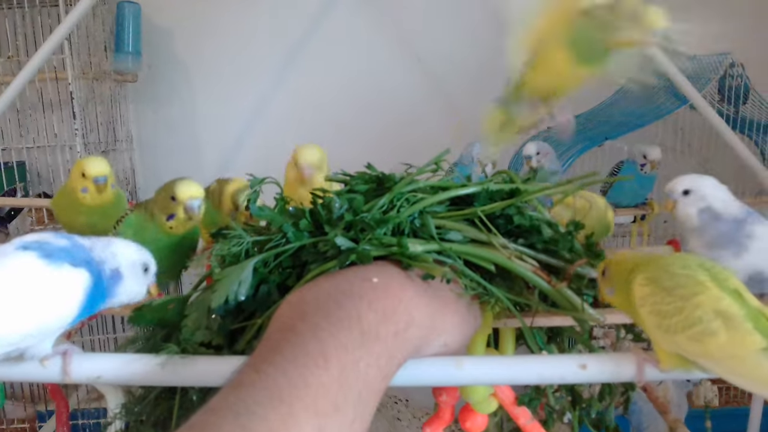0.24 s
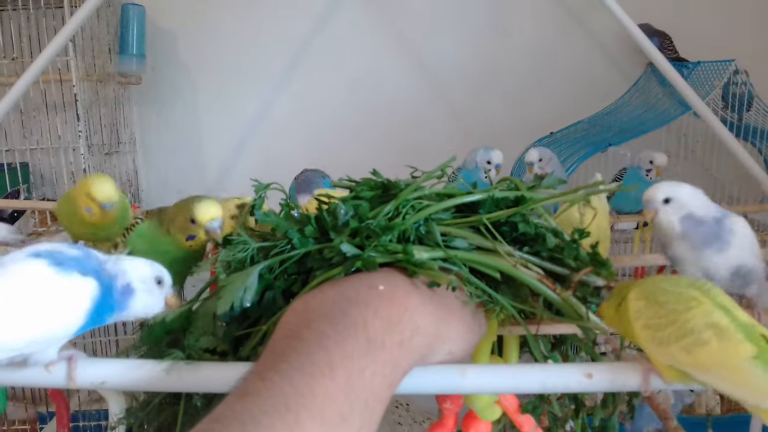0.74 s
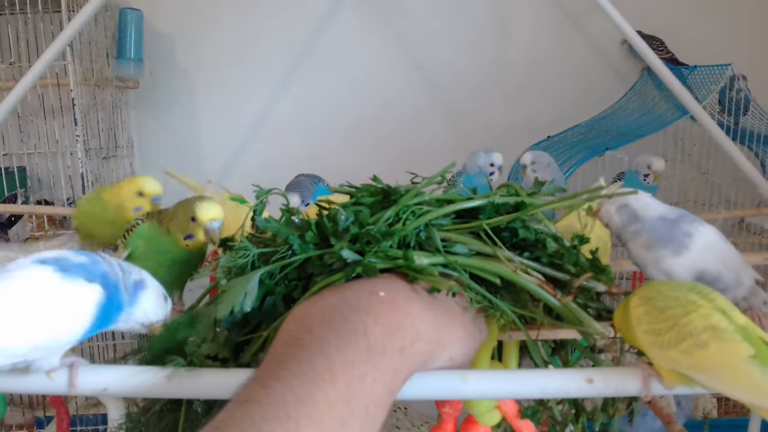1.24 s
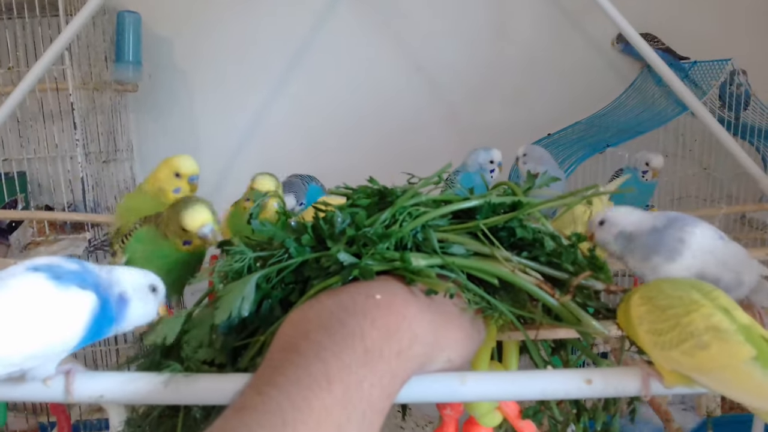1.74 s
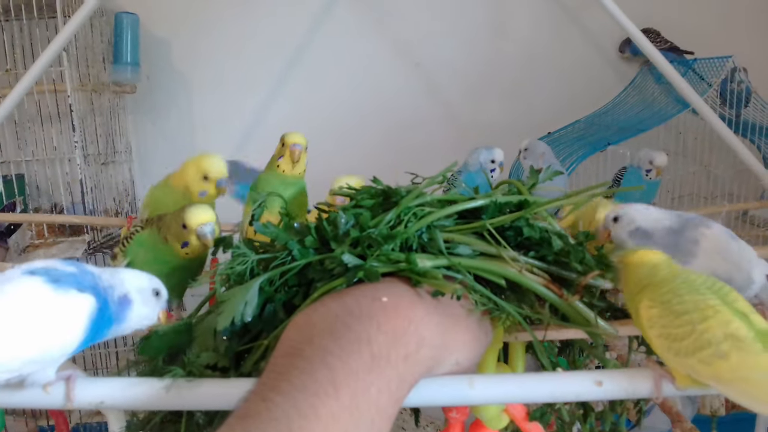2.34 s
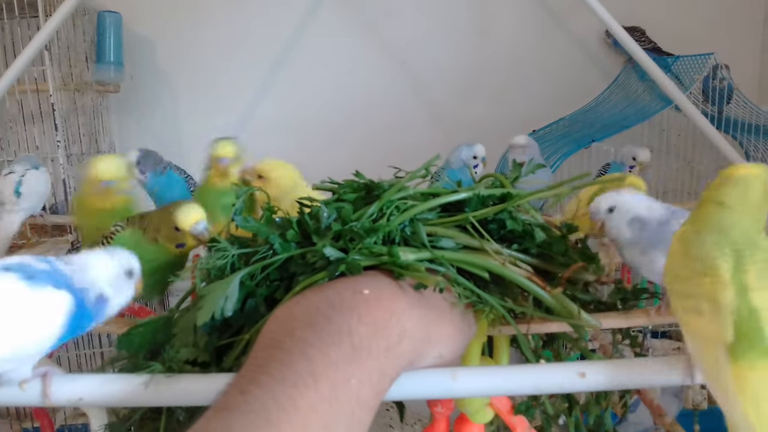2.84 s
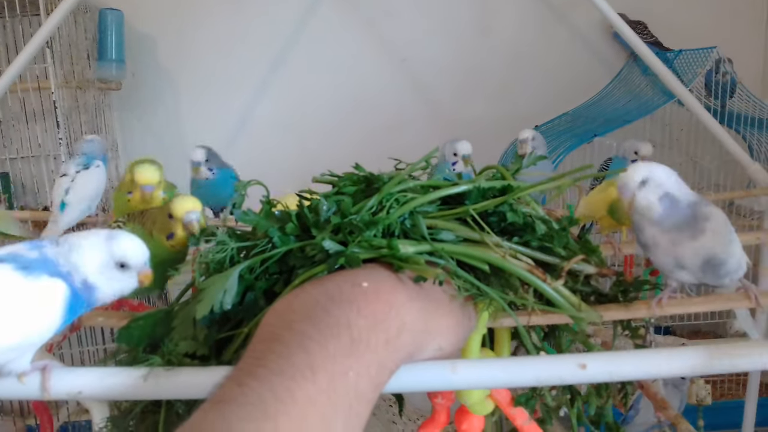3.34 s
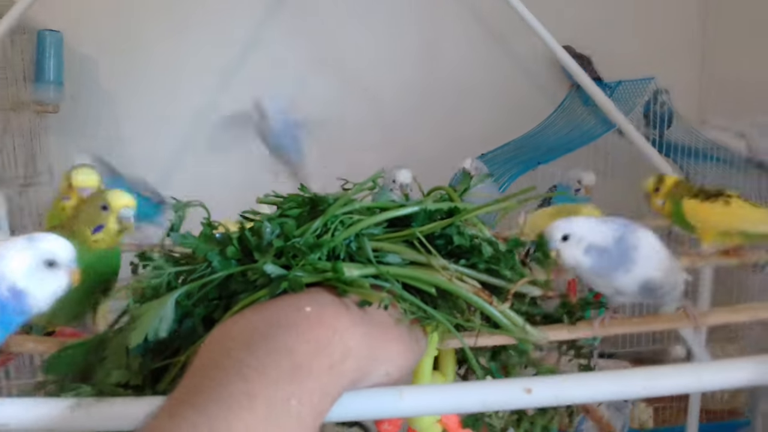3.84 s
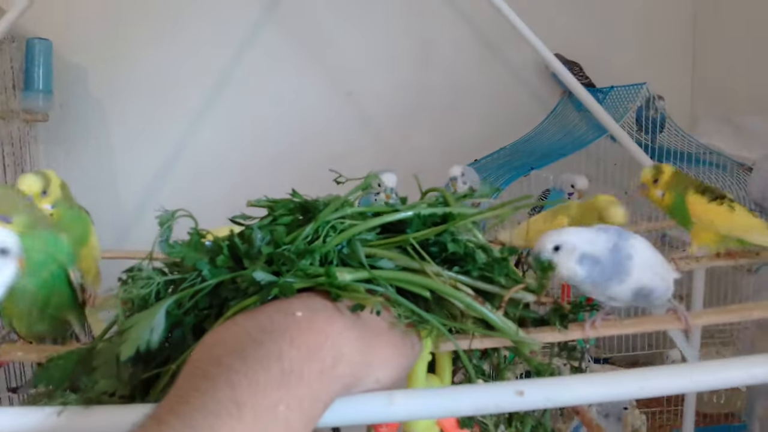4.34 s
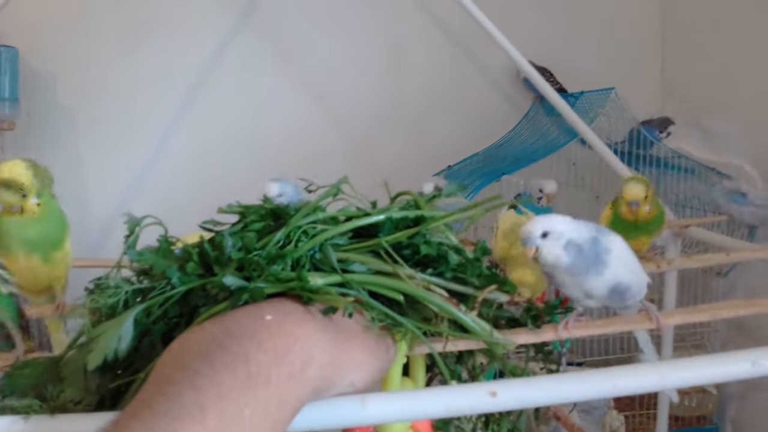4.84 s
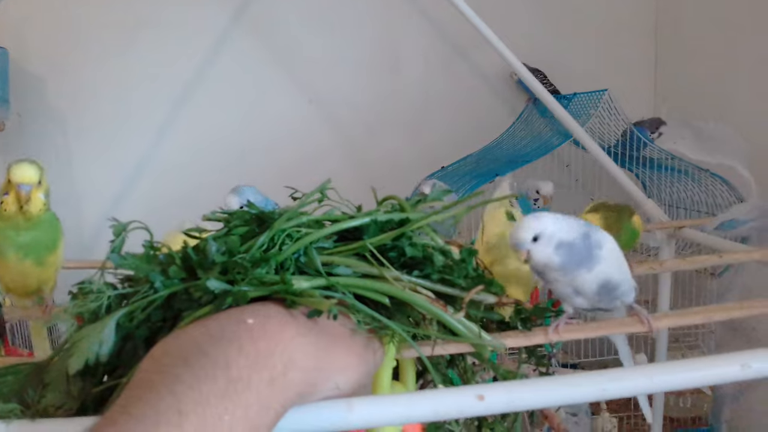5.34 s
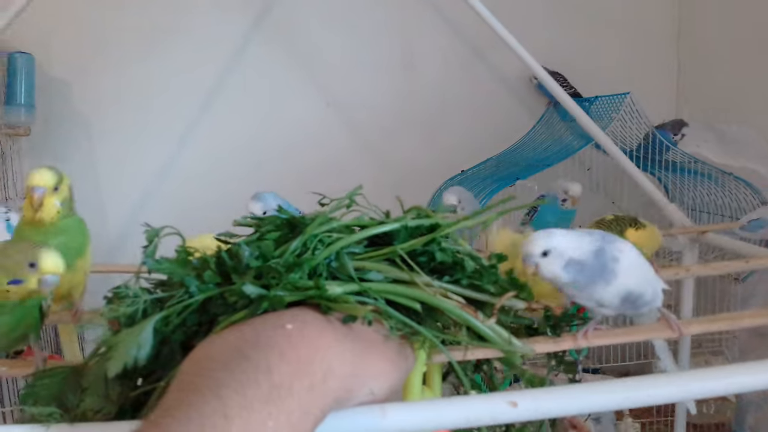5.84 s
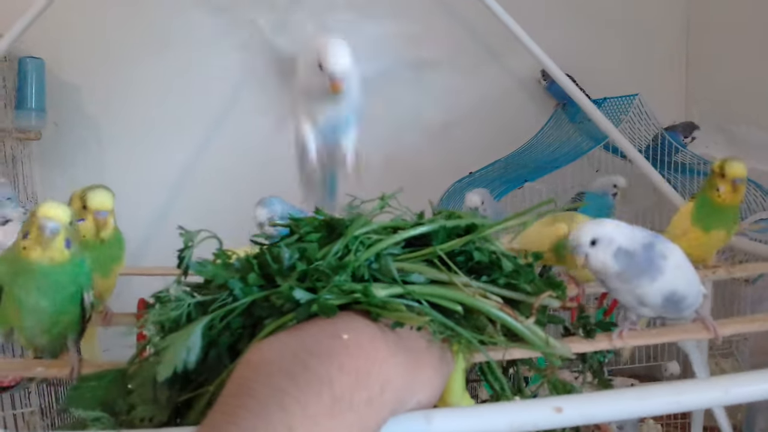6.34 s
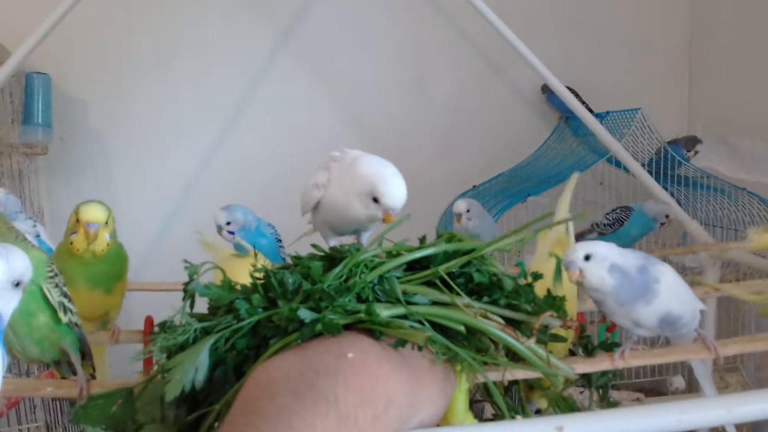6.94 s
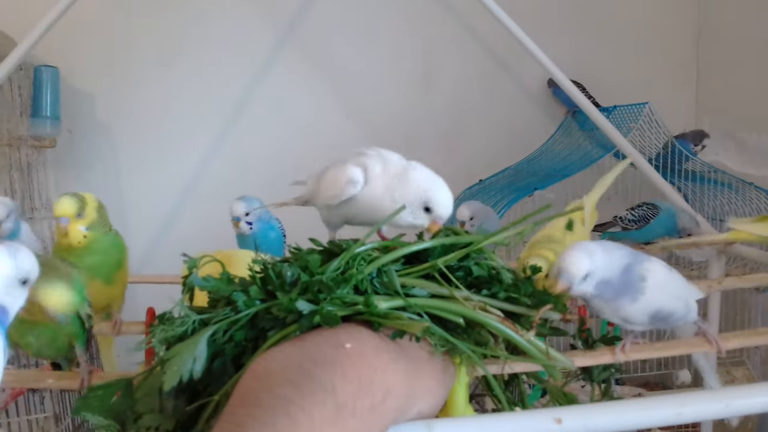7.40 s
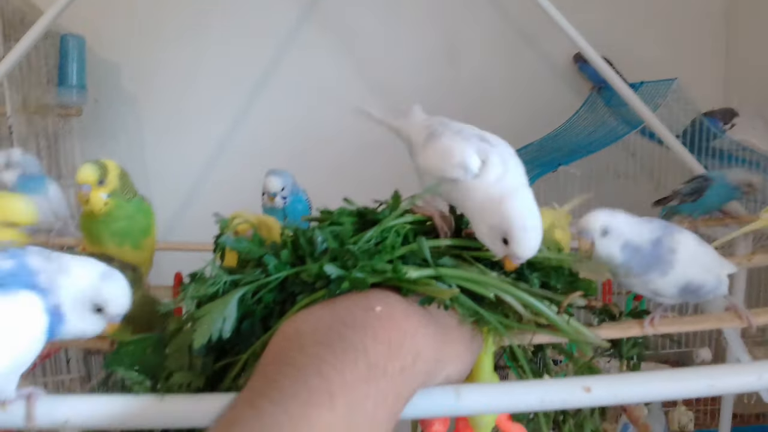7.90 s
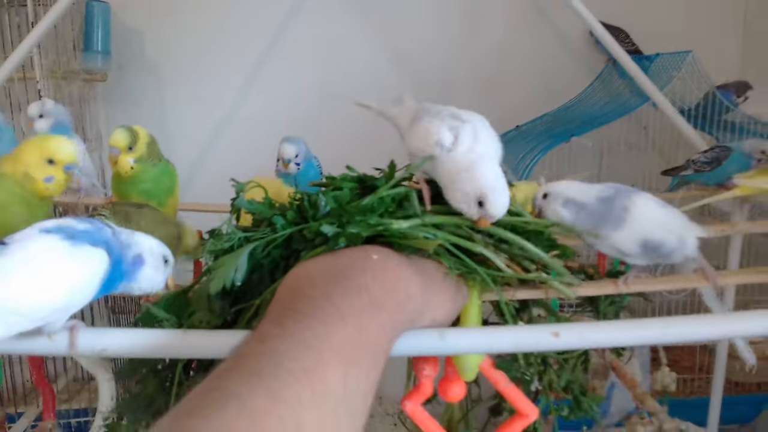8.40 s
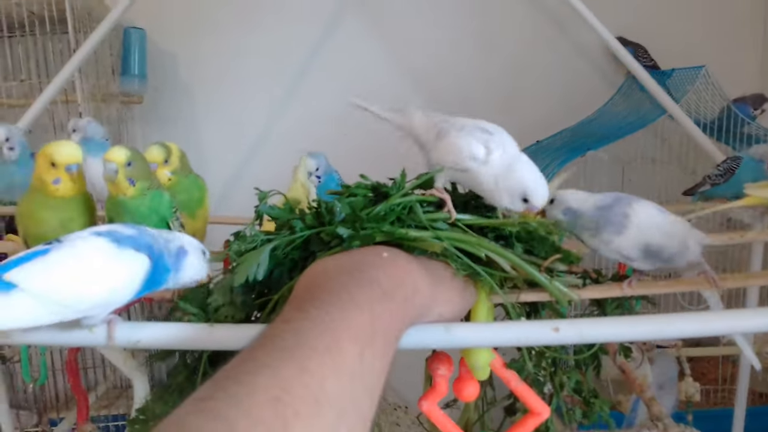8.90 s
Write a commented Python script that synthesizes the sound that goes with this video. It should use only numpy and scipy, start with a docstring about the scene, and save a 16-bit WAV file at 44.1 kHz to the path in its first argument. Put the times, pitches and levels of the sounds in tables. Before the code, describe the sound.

A flock of small parrots chatters in quick hoarse chirps and bright whistled notes, with beak clicks and harsh scolding rasps in a hard-walled room.

```python
"""Small parrots in a cage room

Close to a crowded perch in a hard-walled room of cages. Steady hush, stirred air (coloured noise) and far warbling
lie behind; the flock chatters in a blur of short hoarse glides, and a low coo (a wavering tone) comes and goes.
Close by, beaks click and nibble (noise bursts) and one bird scolds in hoarse rasps (snaps in breath noise through
a throat resonance). In front stand whistled notes and glides: gliding tones with two overtones."""
import sys
import numpy as np
from scipy import signal
from scipy.fft import rfft, irfft, next_fast_len
from scipy.io import wavfile
from scipy.ndimage import uniform_filter1d, minimum_filter1d, map_coordinates

SR = 44100
rng = np.random.default_rng(int(sys.argv[2]) if len(sys.argv) > 2 else 0)


def store_pcm(level_fs):
    """Save levels as 16-bit WAV."""
    pcm = np.round(np.clip(level_fs, -1, 1) * 32767).astype(np.int16)
    wavfile.write(sys.argv[1], SR, np.atleast_2d(pcm).T)


N = 403956

# echo of the hard walls: [f/Hz, time to fall 60 dB/s]
WALL_DECAY = [(300, 0.51), (3000, 0.36), (12000, 0.017)]
# stirred air and rustle over time: [t/s, relative level/dB]
WING_LEVEL = [(0.0, -56), (0.81, -55.5), (1.02, -53.5), (1.3, -63.5), (1.5, -63.5), (1.81, -61.5),
              (2.17, -66.5), (2.73, -70), (3.59, -68), (3.9, -60.5), (4.28, -58), (4.87, -66.5),
              (5.31, -58), (5.81, -65), (6.35, -59), (7.06, -69), (7.93, -74.5), (8.42, -65), (8.67, -56.5),
              (9.16, -62)]
# colour of the rustle: [f/Hz, relative level/dB]
RUSTLE_COLOUR = [(18, -47), (30, -11), (59, -11), (462, -6), (800, -6.5), (1040, -12.5), (1760, -120)]
# colour of the steady hush: [f/Hz, relative level/dB]
HUSH_COLOUR = [(30, -35), (150, -38), (500, -23), (1100, -18), (2200, -1.5), (4500, -15), (10000, -12), (15000, -26)]
# low warbling from the far cages over time: [t/s, relative level/dB]
MURMUR_LEVEL = [(0.0, -37), (0.51, -44), (0.56, -34.5), (0.97, -44.5), (1.2, -41), (1.45, -57),
                (1.6, -34.5), (1.73, -47), (3.54, -45), (3.67, -38), (3.85, -52), (5.15, -44.5),
                (5.79, -58.5), (5.92, -37.5), (6.15, -50), (6.28, -46), (6.38, -53), (7.17, -46),
                (7.47, -62), (7.55, -42), (7.71, -68), (8.24, -37), (8.49, -48), (9.16, -49)]
# bursts of the flock's chatter: [t/s, hold/s, relative level/dB, middle pitch f/Hz]
CHATTER_BURSTS = [(0, 0.036, -17, 3105), (0.087, 0.15, -17, 3006), (0.252, 0.12, -13.5, 3193),
                  (0.543, 0.18, -27, 2455), (0.793, 0.074, -28.5, 2660), (0.88, 0.063, -18, 3030),
                  (1.193, 0.16, -34, 2107), (1.4, 0.095, -18, 3073), (1.606, 0.096, -15, 2973),
                  (1.838, 0.076, -16.5, 3113), (2.041, 0.069, -22, 2880), (2.227, 0.14, -18.5, 3153),
                  (2.514, 0.12, -20.5, 2970), (2.804, 0.065, -16, 3430), (2.902, 0.049, -20, 3080),
                  (3.192, .13, -17, 3036), (3.49, 0.089, -20, 3028), (3.766, 0.15, -19.5, 3084),
                  (4.096, 0.067, -21, 3110), (4.424, 0.16, -22.5, 2910), (4.677, 0.13, -15.5, 3166),
                  (4.894, 0.036, -17.5, 2990), (5.126, 0.073, -15.5, 3080), (5.28, 0.19, -19, 3107),
                  (5.542, 0.23, -17.5, 3070), (5.89, 0.14, -18.5, 3075), (6.137, 0.145, -24.5, 3480),
                  (6.329, 0.16, -20.5, 3038), (6.527, 0.092, -23, 3330), (6.696, 0.042, -30, 2370),
                  (7.002, 0.067, -33, 2795), (7.084, 0.072, -25, 3363), (7.318, 0.023, -35.5, 2160),
                  (7.556, 0.099, -23, 2910), (7.747, 0.37, -26.5, 2687), (8.007, 0.071, -21, 2984),
                  (8.094, 0.076, -19, 2810), (8.217, 0.0405, -24.5, 2272), (8.275, 0.1, -19.5, 2922),
                  (8.493, 0.041, -33, 2860), (8.726, 0.049, -32, 3000), (8.961, .18, -21.5, 3204)]
BURST_RISE_S, BURST_FROM_DB, BURST_FADE_DB_S = 0.0295, -16, 141
# colour of the chatter: [f/Hz, relative level/dB]
WINDPIPE_COLOUR = [(1000, 2), (1900, 1.5), (3700, 5.5), (4400, -5.5), (5500, 2.5), (10000, -5), (12000, -17.5)]
HOARSE_DB = -23  # rasp in the crowd's voices, relative to the burst level
# low coos: [t/s, length/s, start f/Hz, end f/Hz, relative level/dB], before the waver
COO_CALLS = [(0, 0.38, 467, 478, -54), (.55, 0.21, 481.4, 484, -49.5), (1.52, 0.51, 389.3, 385.4, -54),
             (4.1, 0.52, 463, 529, -59), (5.12, 0.82, 486, 494, -57), (8.48, 0.67, 433, 523, -54)]
# the clearest ticks of nibbled stems: [t/s, relative level/dB]
STEM_TICKS = [(0.5616, -18), (1.0286, -39), (1.6122, -30), (1.7194, -30), (1.9744, -29), (2.1565, -30),
              (2.3376, -25), (2.383, -31), (7.5847, -34), (8.31, -24), (8.3379, -18), (8.3938, -26)]
# beak clicks: [t/s, relative level/dB]
BEAK_CLICKS = [(0.1298, -29), (1.1067, -20.5), (2.7782, -21.5), (2.811, -16), (2.9318, -19),
               (6.8785, -17.5), (6.9505, -17), (7.0313, -20), (7.2758, -24), (7.3505, -18.5)]
# colour of a beak click: [f/Hz, relative level/dB]
CLICK_COLOUR = [(500, -37), (1500, -6), (5000, 1.0), (9500, -4.5), (14000, -31)]
# hoarse rasps, near and far: [t/s, rise/s, hold/s, level/dB, middle of the throat resonance f/Hz]
RASP_CALLS = [(.09, 0.031, 0.0091, -28.5, 7900), (.19, 0.046, 0.032, -22.5, 8100),
              (.29, 0.033, 0.031, -21.5, 5230), (.88, 0.0079, 0.034, -31, 5800),
              (1.17, 0.021, 0.018, -34, 5670), (1.404, 0.0068, 0.11, -34.5, 7000),
              (1.608, 0.011, 0.059, -32, 5450), (1.87, 0.046, 0.056, -25.5, 5900),
              (2.77, 0.0085, 0.083, -29.5, 6040), (3.015, 0.025, 0.044, -15.5, 5930),
              (3.32, 0.11, 0.046, -13.5, 6020), (3.612, 0.024, 0.021, -14.5, 6100),
              (3.736, 0.037, 0.22, -16, 5960), (3.99, 0.028, 0.025, -18, 5840),
              (4.112, 0.032, 0.087, -13.5, 5970), (4.31, .018, 0.16, -15, 6150),
              (4.578, 0.031, 0.035, -11, 5180), (4.738, 0.02, 0.05, -15.5, 5110),
              (4.897, 0.019, 0.043, -14, 5700), (5.075, 0.019, 0.031, -15, 5520),
              (5.245, 0.017, 0.03, -15.5, 5860), (5.585, 0.0089, 0.14, -37.5, 7600),
              (7.02, 0.0054, 0.034, -33.5, 6250), (8.285, 0.0053, 0.058, -34, 5560),
              (8.462, 0.023, 0.023, -14.5, 6300), (8.62, 0.019, 0.089, -14, 6660),
              (8.815, 0.016, 0.095, -14.5, 6830), (8.99, 0.032, 0.075, -13, 6600)]
# colour of a rasp, before the throat resonance: [f/Hz, relative level/dB]
BEAK_COLOUR = [(710, -87), (1200, -25), (1860, -9), (2170, -7.5), (3440, 0), (4650, 0.5), (5770, 0),
               (8310, 2.5), (9870, 4), (15700, -13.5)]
# syllables of three stock calls: [start t/ms, length/ms, start f/Hz, end f/Hz, level/dB],
# before the pitch and pace of each call
TWO_VOICED_CALL = [(0, 36.8, 3000, 3650, -6.5), (10, 45, 1700, 1860, -15), (36.6, 32, 2620, 2720, 0),
                   (69, 19.3, 1890, 1930, -5), (99.6, 36.3, 2750, 3180, 0)]
ZIGZAG_CALL = [(0, 16, 3380, 3560, -2), (18.17, 16, 1950, 1800, -11), (34.7, 6.7, 2500, 2600, -2),
               (45.3, 20, 2750, 2950, -3.5), (62, 27.8, 3150, 3200, 0.5)]
UPSWEEP_CALL = [(0, 90, 1350, 1880, -8.5), (83.6, 46, 1940, 1900, 2)]
# when the stock calls are sung: [t/s, added level/dB, pitch factor, pace factor (above 1 is slower)]
TWO_VOICED_TIMES = [(1.405, -19, 1.11, 0.94), (2.555, -18.5, 1.04, 0.96), (3.203, -16, 1.02, 1.03),
                    (3.796, -17.5, 1.037, 0.96), (4.697, -21, 1.01, 0.89)]
ZIGZAG_TIMES = [(.135, -15, 1.02, 0.84), (1.655, -17, 0.99, 0.9), (2.293, -16, 0.99, 0.8),
                (4.475, -16, .96, .99), (5.139, -11.5, 1, 1.1)]
UPSWEEP_TIMES = [(.575, -36, .99, 1.1), (.74, -40, 0.96, 0.73), (.85, -32, 1.01, .7),
                 (1.169, -30.5, 1.04, 0.76), (1.285, -30.5, 1.12, .9), (4.959, -38, .9, 1.2),
                 (5.3, -31, 1, 0.71), (6.29, -32.5, 0.97, 0.73), (7.249, -31.5, .99, 1.07),
                 (7.536, -33.5, 0.99, 0.88), (7.829, -44, 1.1, 1.04), (8.291, -32, 1.02, .8)]
# single whistled notes: [t/s, length/ms, start f/Hz, end f/Hz, level/dB], before throb and waver
SINGLE_NOTES = [(0.0, 8.3, 2790, 3490, -9), (0.021, 20, 3564, 3510, -20), (0.129, 18, 4560, 2590, -24.5),
                (0.242, 22, 4690, 3430, -16.5), (0.281, 33, 2680, 2520, -29),
                (0.337, 49, 2720, 2860, -21.5), (0.363, 11, 3390, 3130, -13.5),
                (0.423, 18, 3360, 3220, -18), (0.433, 16, 2870, 2680, -17), (0.509, 22, 2270, 2220, -28.5),
                (0.67, 23, 2490, 3000, -26), (0.825, 25, 3560, 3570, -30), (0.928, 44, 3630, 3400, -22.5),
                (0.97, 22, 2435, 2400, -21), (1.114, 39, 1140, 1440, -42), (1.135, 36, 3540, 3500, -35),
                (1.489, 46, 2895, 2843, -17.5), (1.529, 15, 3390, 3480, -22), (1.822, 17, 3100, 2950, -20),
                (1.893, 16.3, 2560, 3080, -19.5), (1.916, 19, 3430, 3500, -19),
                (2.041, 19, 2350, 2290, -23.5), (2.066, 27, 3140, 3460, -22), (2.104, 48, 2680, 3390, -17),
                (2.259, 14, 1980, 2420, -27.5), (2.601, 22, 3490, 3670, -21.5),
                (2.822, 20, 4550, 3640, -19), (2.829, 49, 2040, 2007, -28), (2.84, 18, 2730, 3680, -19),
                (2.853, 8, 3680, 3720, -10), (2.898, 44, 2965, 2670, -19), (2.945, 38.5, 2840, 3150, -16),
                (2.969, 13, 3600, 3520, -24), (3.364, 20, 3010, 3250, -20), (3.51, 20, 2950, 3090, -16),
                (3.565, 18.3, 2860, 3225, -14), (3.675, 29, 1254, 1360, -41),
                (4.445, 24, 1334, 2960, -23.5), (4.471, 21, 2560, 2950, -9), (4.491, 10, 3660, 2000, -22),
                (4.508, 11, 2590, 3700, -14), (4.723, 17, 3080, 3530, -17.5),
                (4.936, 15.3, 2620, 2760, -17), (5.343, 37, 3510, 3366, -16.5),
                (5.379, 18, 3590, 3260, -16), (5.403, 13, 3370, 3330, -15), (5.414, 18, 3006, 2620, -14.5),
                (5.427, 44, 3220, 3100, -19.5), (5.612, 50, 1870, 1920, -26),
                (5.649, 27, 3074, 2800, -17.5), (5.702, 32, 3440, 3430, -20), (5.872, 36, 1680, 1630, -35),
                (5.899, 20, 2600, 2530, -25), (5.971, 14, 1956, 2020, -25), (5.991, 31, 2840, 3100, -16),
                (5.609, 44, 3780, 3810, -23), (5.622, 32, 2910, 3250, -19.5),
                (5.688, 12.5, 2880, 2990, -17.5), (5.733, 18, 3930, 3800, -19.5),
                (5.789, 14, 2640, 2680, -20.5), (5.932, 22, 3090, 3010, -23), (6.01, 44, 3430, 3670, -18),
                (6.073, 19, 3520, 3340, -18), (6.136, 41, 4330, 3450, -22), (6.183, 26, 2700, 2480, -17.5),
                (6.22, 86, 3460, 3575, -18.5), (6.23, 16, 3185, 2770, -16.5), (6.238, 53, 1523, 1250, -40),
                (6.373, 17, 3590, 3540, -24.5), (6.385, 41, 2635, 2163, -21.5),
                (6.421, 47, 3087, 3085, -15), (6.549, 39, 3510, 3430, -20.5),
                (6.647, 10, 3260, 3180, -20.5), (6.715, 14.4, 2050, 1290, -33), (6.858, 26, 1500, 773, -47),
                (7.118, 33, 1150, 763, -45.5), (7.124, 14, 3605, 3400, -21), (7.149, 39, 3400, 3430, -32),
                (7.202, 64, 3410, 3350, -31.5), (7.63, 47, 2280, 2610, -29.5), (7.664, 64, 2650, 2586, -21),
                (7.681, 18, 2190, 2250, -27), (7.788, 23.5, 3300, 3630, -22.5),
                (7.857, 47, 3274, 3440, -27.5), (7.97, 56, 1370, 1650, -44), (7.953, 14, 2240, 2120, -30),
                (8.019, 52, 2685, 3810, -28.5), (8.09, 60, 790, 920, -47.5), (8.078, 13, 2520, 2330, -23),
                (8.122, 33, 3035, 3050, -24), (8.145, 25, 1780, 1810, -31), (8.237, 120, 1780, 2186, -33),
                (8.324, 22, 3666, 3310, -24), (8.24, 43, 940, 1360, -46), (8.37, 42, 864, 1420, -45),
                (8.381, 25, 2830, 3040, -22.5), (8.514, 26, 2400, 2660, -25.5),
                (8.756, 32, 2960, 2890, -24), (9.092, 34, 2560, 2780, -21)]
TOP_HZ = 15820  # upper limit of the microphone's band


def amp(db):
    """Gain of a level in dB."""
    return 10 ** (np.asarray(db) / 20)


def unit(x):
    """x at rms 1."""
    return x / np.sqrt(np.mean(x ** 2) + 1e-20)


def along(points, hz):
    """Values of (f/Hz, value) points, interpolated on a log frequency axis."""
    f, v = np.transpose(points)
    return np.interp(np.log(hz + 1), np.log(f + 1), v)


def level_curve(rows):
    """One level in dB per sample from (t/s, level/dB) rows."""
    s, db = np.transpose(rows)
    return np.interp(np.arange(N) / SR, s, db)


def wobble(rate):
    """A smooth random curve, rate knots a second."""
    return map_coordinates(rng.standard_normal(int(N * rate / SR) + 4), [np.arange(N) * rate / SR])


def filtered(x, response):
    """x times a response of frequency."""
    m = next_fast_len(N + SR // 2)
    return irfft(rfft(x, m) * response(np.fft.rfftfreq(m, 1 / SR)), m)[..., :N]


def coloured(x, colour):
    """x shaped by a colour table."""
    return filtered(x, lambda hz: amp(along(colour, hz)))


def room(x):
    """The walls answer 200 samples late with a noise tail; each frequency dies at its own speed."""
    hz, t, z = signal.stft(rng.standard_normal(SR // 2), SR, nperseg=256)
    decay = amp(-60 * t / along(WALL_DECAY, hz)[:, None])
    tail = signal.istft(z * decay, SR, nperseg=256)[1]
    return signal.fftconvolve(np.pad(x, (200, 0)), tail / np.linalg.norm(tail))[:N]


def whistles(s, life, start_hz, end_hz, db, second_db, third_db, throb_db, waver):
    """Gliding tones with two overtones; the syrinx throbs in level and wavers fast in pitch."""
    s, life, start_hz, end_hz, db = (np.asarray(v)[:, None] for v in (s, life, start_hz, end_hz, db))
    n = np.arange(int(life.max() * SR) + 1)
    at = np.minimum(np.round(s * SR).astype(int) + n, N - 1)
    progress = np.clip(n / SR / life, 0, 1)
    lane = (at + rng.integers(0, N, s.shape)) % N  # every note trembles in its own way
    hz = (start_hz + (end_hz - start_hz) * progress) * (1 + waver * wobble(220)[lane])
    phase = 2 * np.pi * np.cumsum(hz, axis=1) / SR
    tone = np.sin(phase) + amp(second_db) * np.sin(2 * phase) + amp(third_db) * np.sin(3 * phase)
    throb = throb_db * np.minimum(wobble(260), .9)[lane]
    swell = np.sin(np.pi * progress) ** .5 * amp(db + throb)
    return np.bincount(at.ravel(), (np.sqrt(2) * swell * tone).ravel(), N)


def air():
    """Turbulence as coloured noise: rustle of wings and leaves over the faint hush of the room."""
    rustle = unit(coloured(rng.standard_normal(N), RUSTLE_COLOUR))
    hush = unit(coloured(rng.standard_normal(N), HUSH_COLOUR))
    rustle_db = level_curve(WING_LEVEL) + 5 + 1.4 * wobble(9.9)
    hush_db = -41.0 + 1.5 * wobble(6)
    return amp(rustle_db) * rustle + amp(hush_db) * hush


def murmur(count=700):
    """Low rising warbles of distant birds, heard mostly off the walls."""
    when, long = rng.random((count, 2)).T
    pitch, size = rng.standard_normal((count, 2)).T
    hz = 1320 * np.exp(.15 * pitch)
    far = whistles(when * N / SR, .012 + .04 * long, hz, 1.2 * hz, 3 * size,
                   second_db=-35, third_db=-25, throb_db=3, waver=0.028)
    return amp(level_curve(MURMUR_LEVEL) - 3.0) * unit(.6 * far + room(far))


def bursts():
    """Power and middle pitch of the chatter: each burst swells, holds and fades."""
    s, hold, db, hz = (v[:, None] for v in np.transpose(CHATTER_BURSTS))
    t = np.arange(0, N / SR, .002)
    swell_db = BURST_FROM_DB * np.clip(1 - (t - s) / BURST_RISE_S, 0, 1)
    fade_db = BURST_FADE_DB_S * np.maximum(t - s - BURST_RISE_S - hold, 0)
    power = amp(db + swell_db - fade_db) ** 2 * (t >= s) + 1e-12
    total = power.sum(0)
    middle_hz = (power * hz).sum(0) / total  # the pitch is the power-weighted mean of the overlapping bursts
    return [np.interp(np.arange(N) / SR, t, v) for v in (total, middle_hz)]


def chatter(count=5000):
    """A dense blur of short hoarse glides round the flock's middle pitch, smeared by the walls."""
    power, middle_hz = bursts()
    when, long = rng.random((count, 2)).T
    pitch, glide, size = rng.standard_normal((count, 3)).T
    hz = np.clip(middle_hz[(when * N).astype(int)] * np.exp(.21 * pitch - .04), 1450, 4400)
    end_hz = hz * np.exp(0.038 + 0.0906 * glide)
    crowd = whistles(when * N / SR, .005 + .02 * long ** 2, hz, end_hz, 3 * size,
                     second_db=-17.5, third_db=-9.5, throb_db=5.0, waver=0.017)
    voices = coloured(crowd + 0.5 * room(crowd), WINDPIPE_COLOUR)
    return amp(-3.5) * np.sqrt(power) * unit(voices)


def coos():
    """A soft low tone from further off, blurred by a strong random waver of its pitch."""
    s, life, start_hz, end_hz, db = np.transpose(COO_CALLS)
    return whistles(s, life, start_hz, end_hz, db, second_db=-13, third_db=-56, throb_db=2.5, waver=0.14)


def ticks(count=260):
    """Stems snap and claws tap: brief bright noise bursts, a few clear ones among many faint."""
    when, size = rng.random((count, 2)).T
    s, db = np.transpose(STEM_TICKS)
    faint_db = -38 - 9 * np.log10(size + 1e-3)
    at = (np.r_[when * N / SR, s] * SR).astype(int)
    spikes = np.bincount(at, amp(np.r_[faint_db, db + 8]), N)
    t = np.arange(SR // 200) / SR
    burst = rng.standard_normal(len(t)) * amp(-60 * t / 0.015)
    # the dull part below 8 kHz is taken away
    return filtered(signal.fftconvolve(spikes, burst / 3)[:N], lambda hz: 1 / (1 + (8000 / (hz + 1)) ** 4))


def clicks():
    """Hard beak snaps: bright noise falling 60 dB in 48 ms, each with a weaker twin 8 ms before."""
    out, t = np.zeros(N + SR), np.arange(SR // 20) / SR
    for s, db in BEAK_CLICKS:
        for lead_s, more_db in ((0, 4.5), (.008, -9.5)):
            snap = amp(db + more_db - 60 * t / 0.048) * rng.standard_normal(len(t))
            out[round((s - lead_s) * SR):][:len(t)] += snap
    return coloured(out[:N], CLICK_COLOUR)


def rasp_effort():
    """Power and throat resonance of the rasps, over a share of the crowd's hoarseness."""
    effort = amp(HOARSE_DB) ** 2 * bursts()[0]
    throat_hz, t = np.full(N, RASP_CALLS[0][4]), np.arange(N) / SR
    for s, rise, hold, db, hz in RASP_CALLS:
        n = slice(round(s * SR), round((s + rise + hold + .3) * SR))
        age = t[n] - s
        rise_db = 17.4 * np.clip(1 - age / rise, 0, 1)
        fade_db = 237 * np.clip(age - rise - hold, 0, 1)
        effort[n] += amp(db - rise_db - fade_db) ** 2
        throat_hz[n.start:] = hz  # kept until the next rasp
    return effort, throat_hz


def rasp(size=256):
    """Uneven snaps of the syrinx in breath noise, through a throat resonance and its upper partner."""
    effort, throat_hz = rasp_effort()
    t = np.arange(N) / SR
    cycles = np.cumsum(930 * np.exp(.08 * wobble(40))) / SR  # about 930 snaps a second
    snaps = np.diff(np.floor(cycles), prepend=0) * amp(1.63 * rng.standard_normal(N))
    breath = rng.standard_normal(N)
    flutter = amp(1.33 * wobble(300) + 1.8 * wobble(40))
    source = (0.29 * unit(snaps - snaps.mean()) + 0.85 * breath) * flutter

    hz, frames, z = signal.stft(source, SR, nperseg=size)
    f = hz[:, None]
    centre = np.interp(frames, t, throat_hz * np.exp(0.049 * wobble(25)))
    throat_db = 10.25 * np.exp(-((f - centre) / 770) ** 2)
    partner_db = 1.6 * np.exp(-((f - 1.49 * centre) / 390) ** 2)
    shape = amp(along(BEAK_COLOUR, hz)[:, None] + throat_db + partner_db)

    # random patches of time and frequency stand out a little
    patches = uniform_filter1d(rng.standard_normal(z.shape), size=3, axis=0)
    patches = uniform_filter1d(patches, size=7, axis=1)
    # louder, nearer rasps keep more of their top above 10 kHz
    near = np.interp(frames, t, np.log10(effort + 1e-6)) + 1.17
    top_db = 7.5 * near * np.clip(f / 10000 - 1, 0, 1) ** 0.13
    shape = shape * amp(2.3 * unit(patches) + top_db)
    return np.sqrt(effort) * unit(signal.istft(z * shape, SR, nperseg=size)[1][:N])


def sung(syllables, calls):
    """One note row for each syllable of each call, moved in pitch and pace."""
    return [(s + pace * at / 1000, pace * ms, pitch * start_hz, pitch * end_hz, db + more_db)
            for s, db, pitch, pace in calls for at, ms, start_hz, end_hz, more_db in syllables]


def notes():
    """The whistles that stand out of the crowd: nearly pure tones with faint overtones."""
    calls = (sung(TWO_VOICED_CALL, TWO_VOICED_TIMES) + sung(ZIGZAG_CALL, ZIGZAG_TIMES)
             + sung(UPSWEEP_CALL, UPSWEEP_TIMES))
    s, ms, start_hz, end_hz, db = np.transpose(SINGLE_NOTES + calls)
    return whistles(s, ms / 1000, start_hz, end_hz, db, second_db=-19, third_db=-24, throb_db=3, waver=.013)


def scene():
    """All layers sound directly; the walls also answer the whistles, the near sounds and the coos."""
    background = air() + murmur() + chatter()
    low = coos()
    near = ticks() + clicks() + rasp()
    song = notes()
    echo = room(amp(-7) * song + amp(-8.5) * near + amp(-8.0) * low)
    return (background + low + near + song + echo)[None]


def record(dry):
    """A fast limiter holds the peaks; the microphone keeps little deep bass and nothing above its band limit."""
    needed = np.minimum(1, .9 / (np.abs(dry) + 1e-9))
    gain = uniform_filter1d(minimum_filter1d(needed, size=161), size=81)
    return filtered(dry * gain, lambda hz: (hz < TOP_HZ) / (1 + (34 / (hz + 1)) ** 4))


dry = scene()
out = record(dry)
store_pcm(out)
```